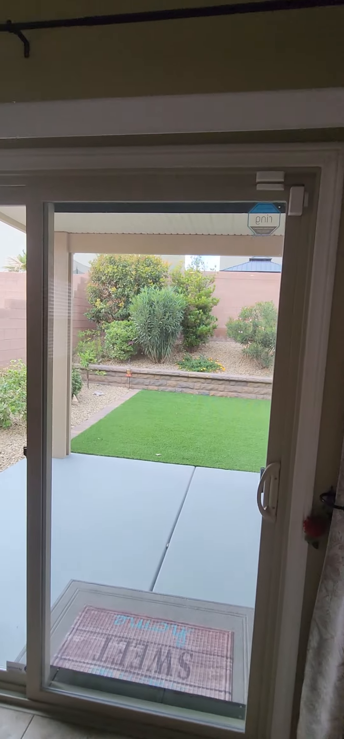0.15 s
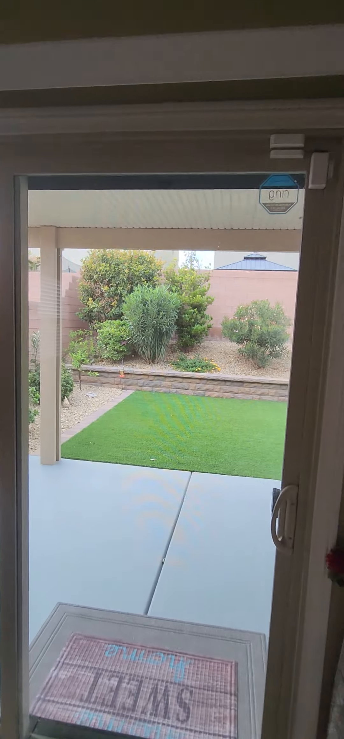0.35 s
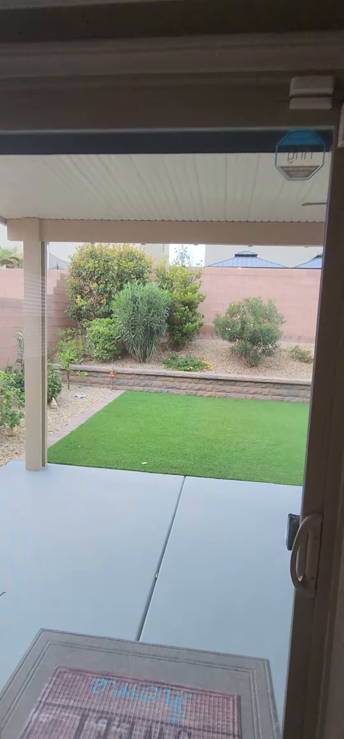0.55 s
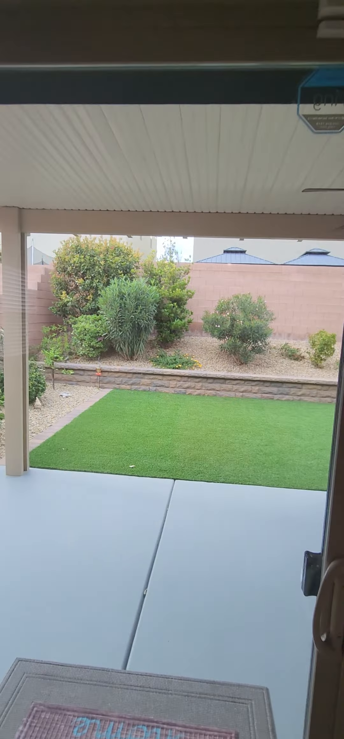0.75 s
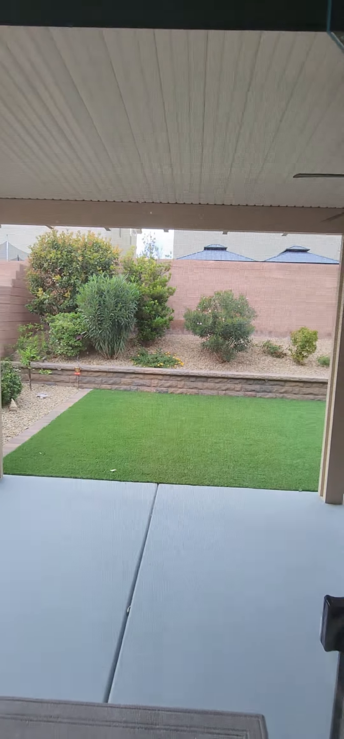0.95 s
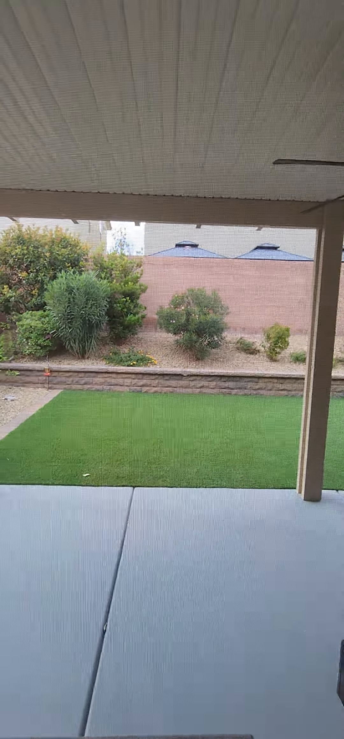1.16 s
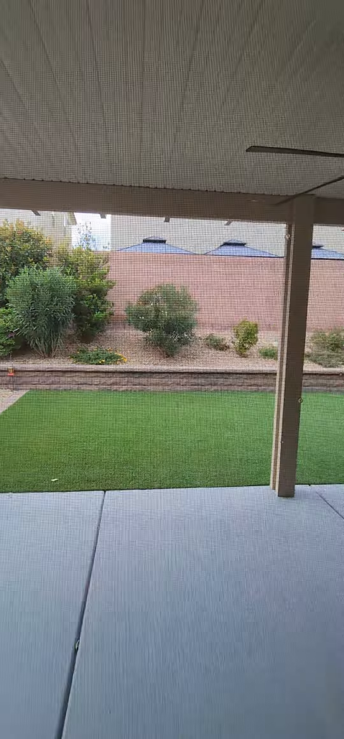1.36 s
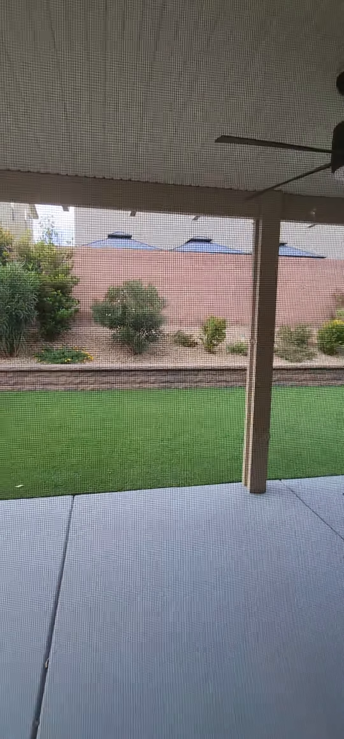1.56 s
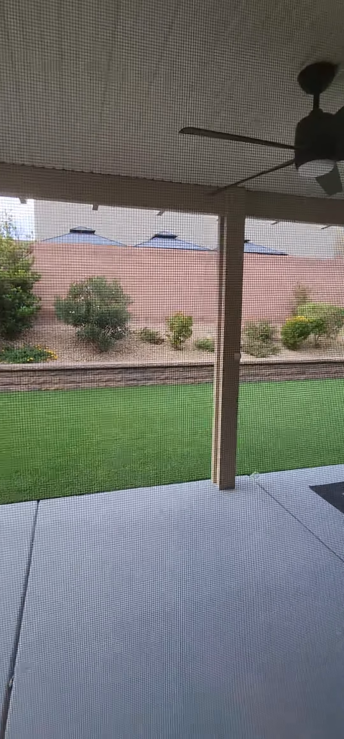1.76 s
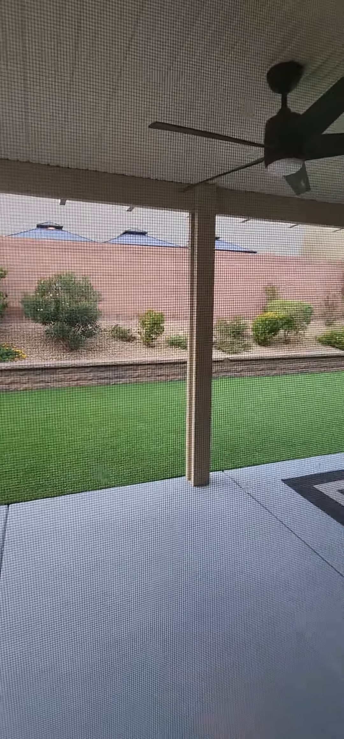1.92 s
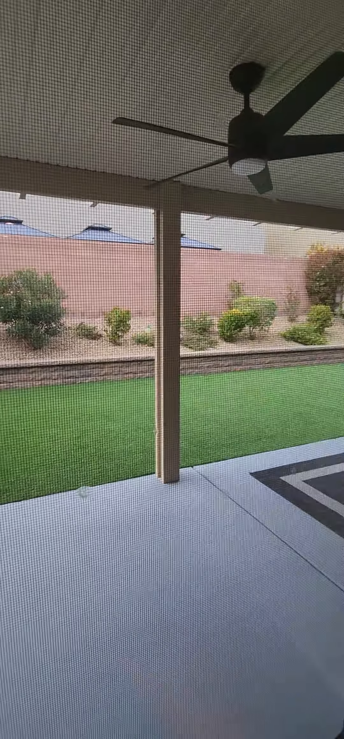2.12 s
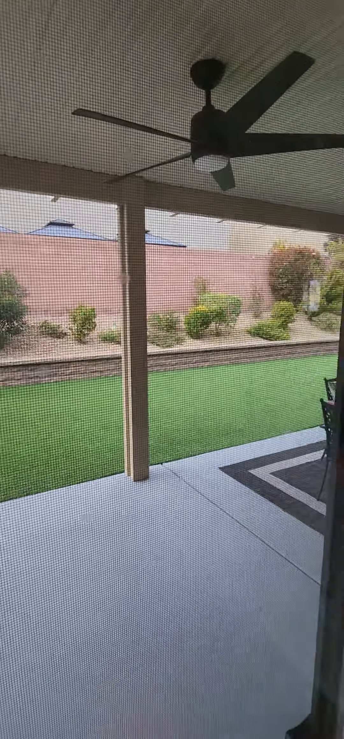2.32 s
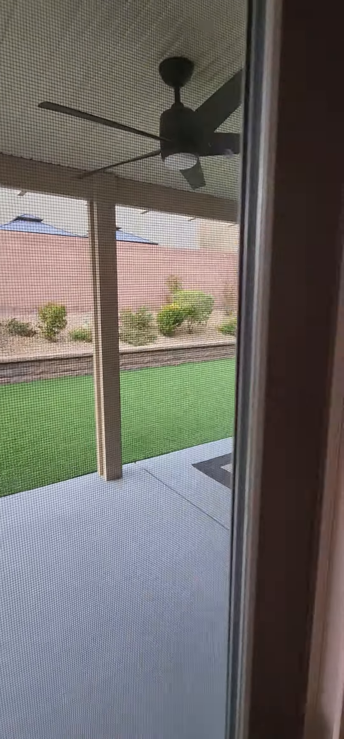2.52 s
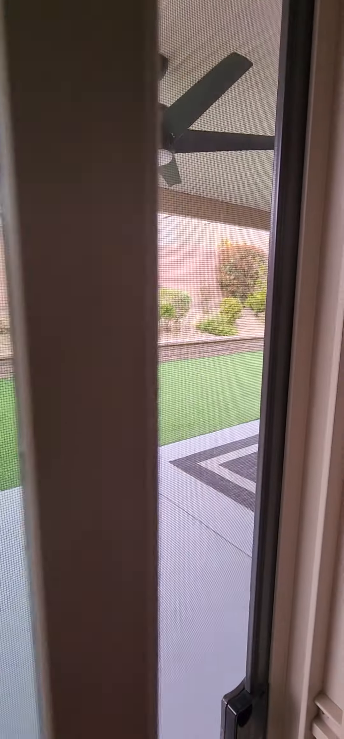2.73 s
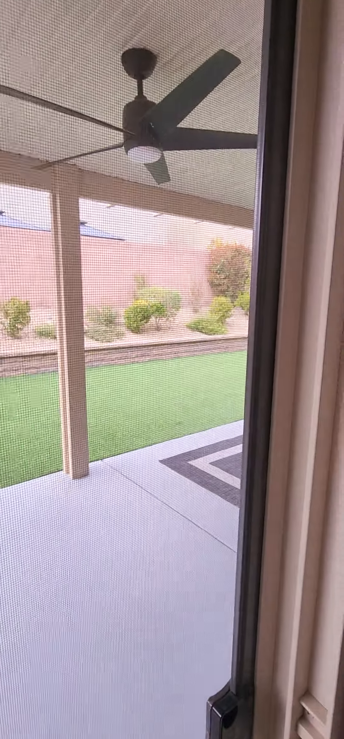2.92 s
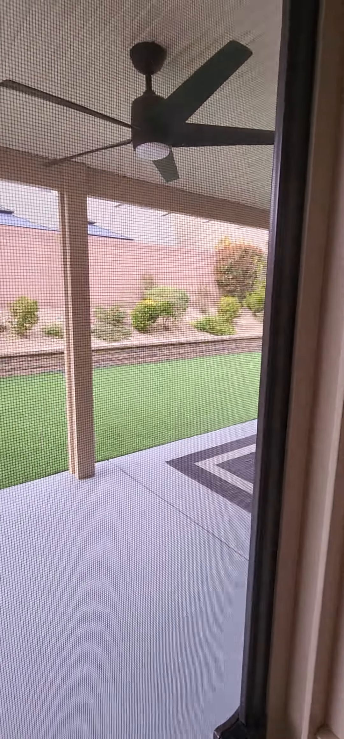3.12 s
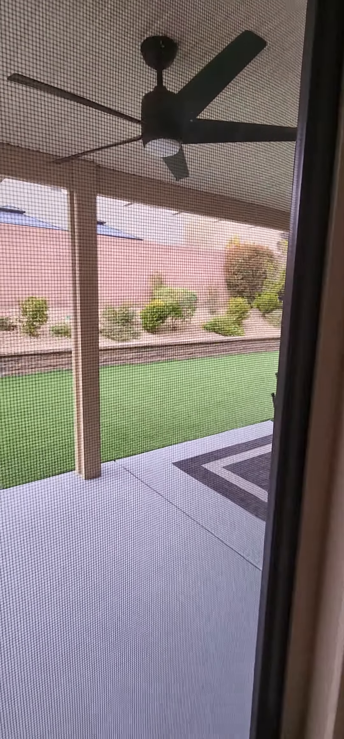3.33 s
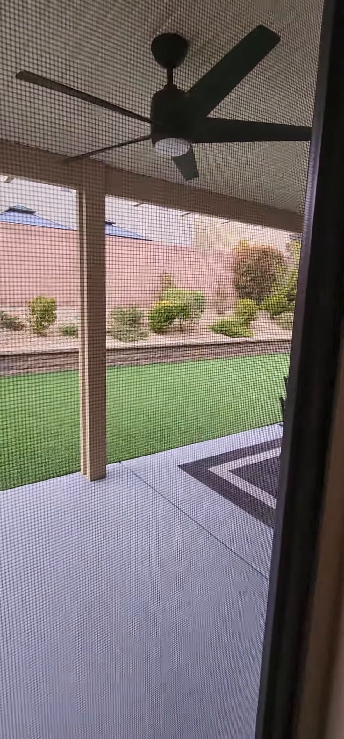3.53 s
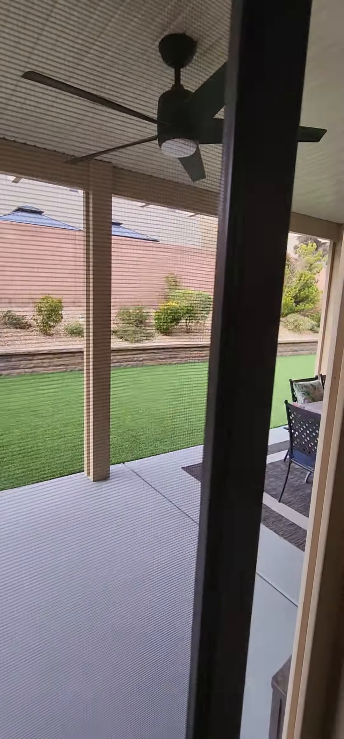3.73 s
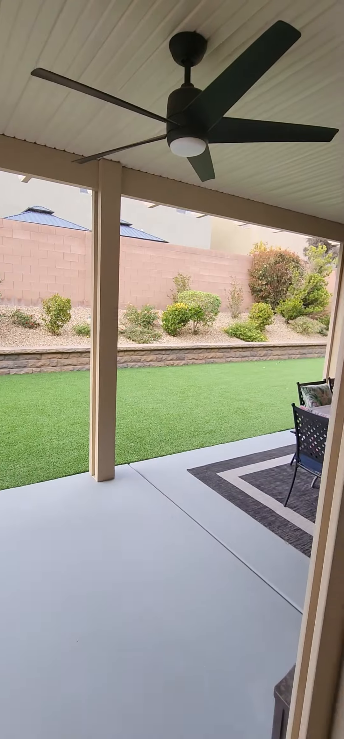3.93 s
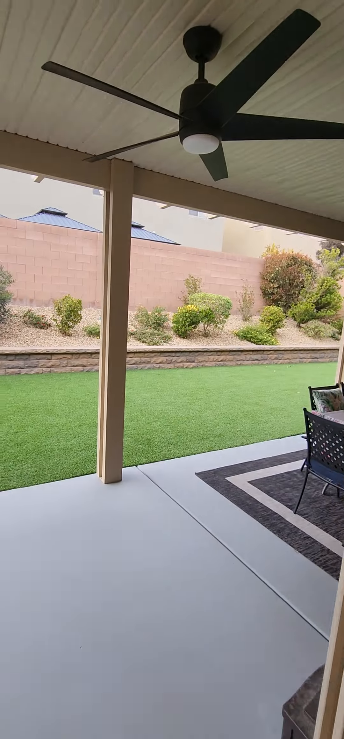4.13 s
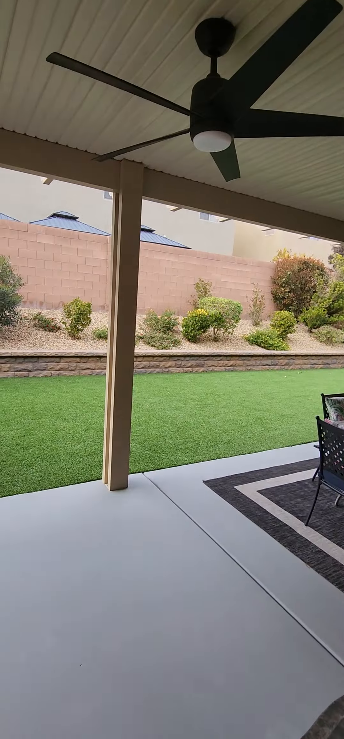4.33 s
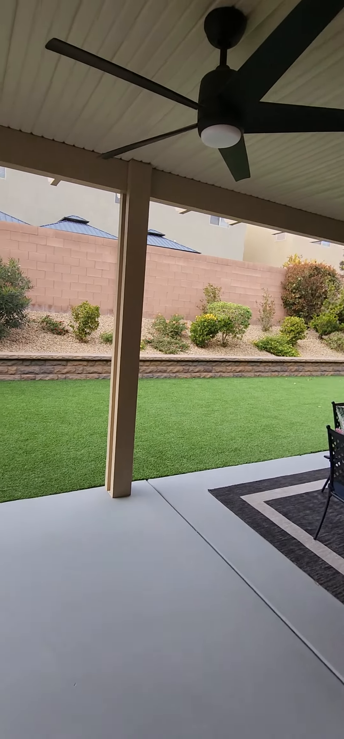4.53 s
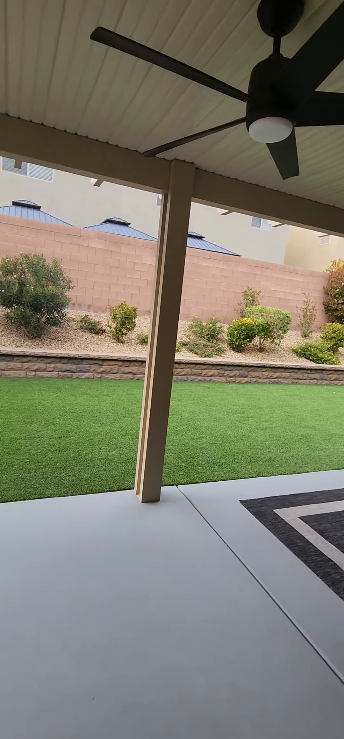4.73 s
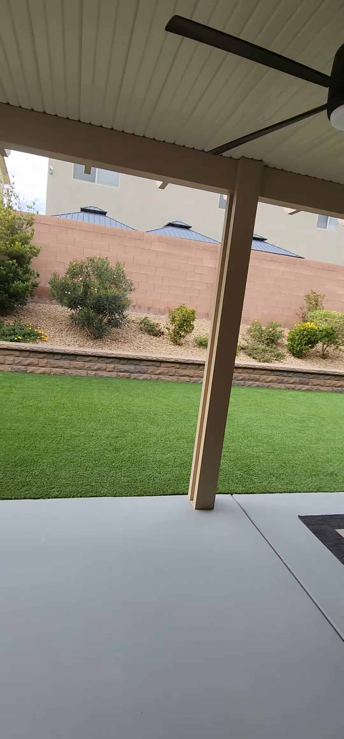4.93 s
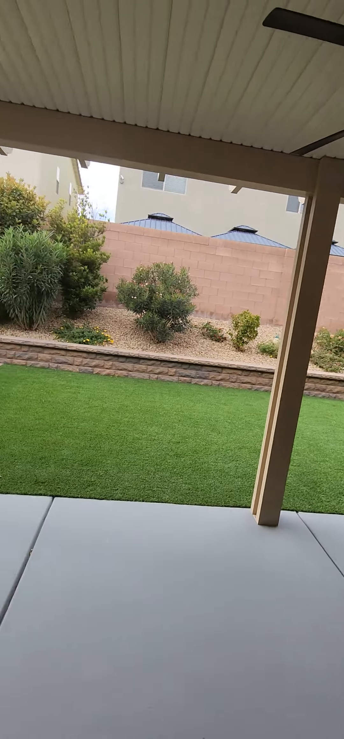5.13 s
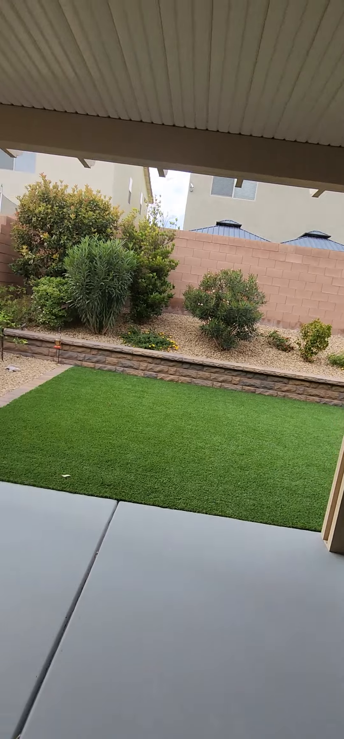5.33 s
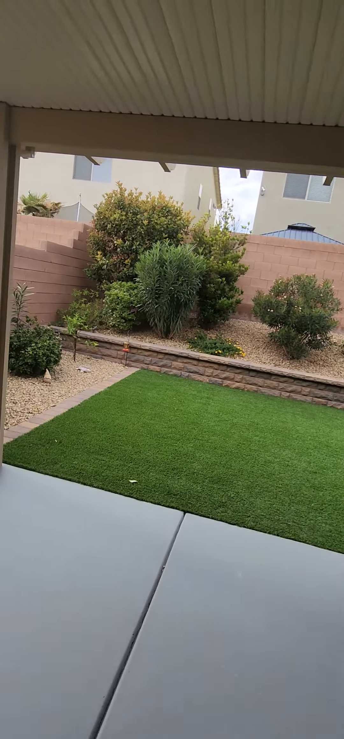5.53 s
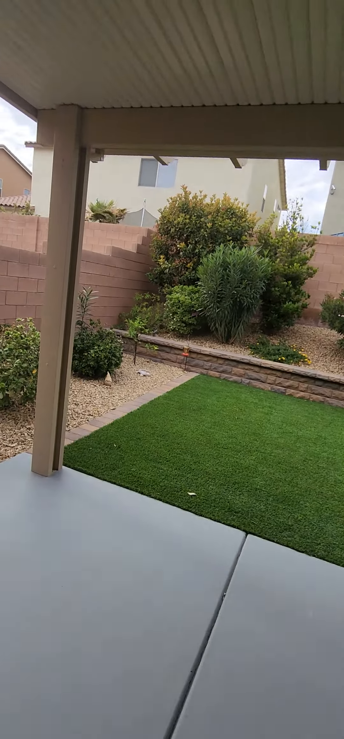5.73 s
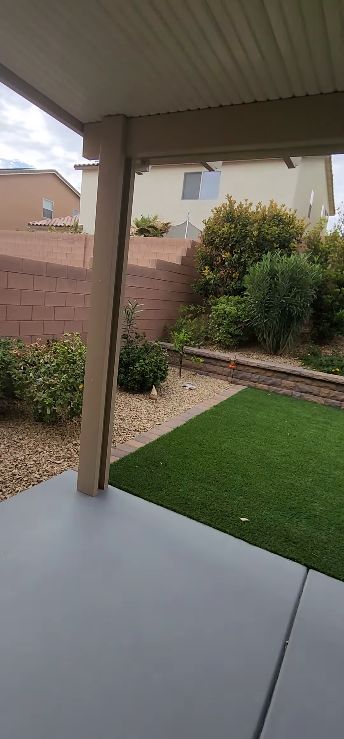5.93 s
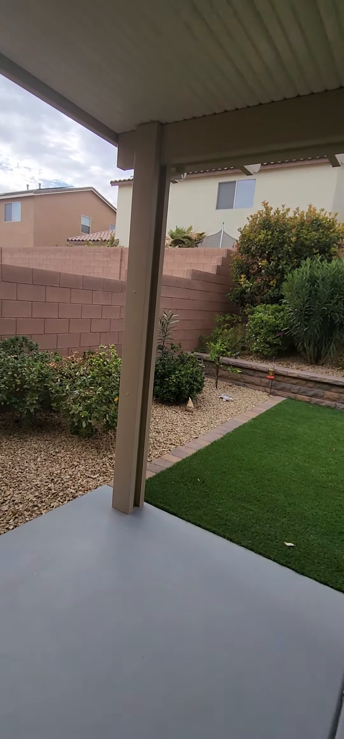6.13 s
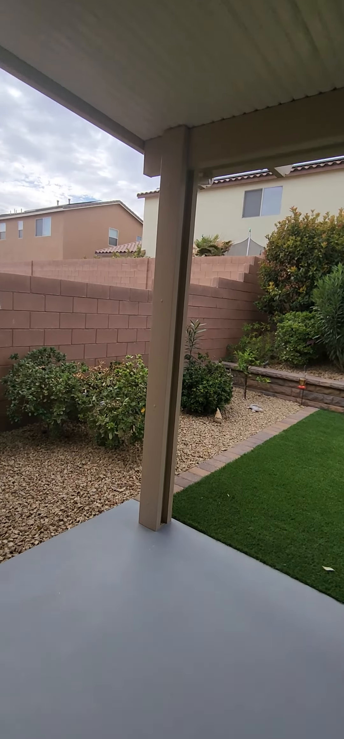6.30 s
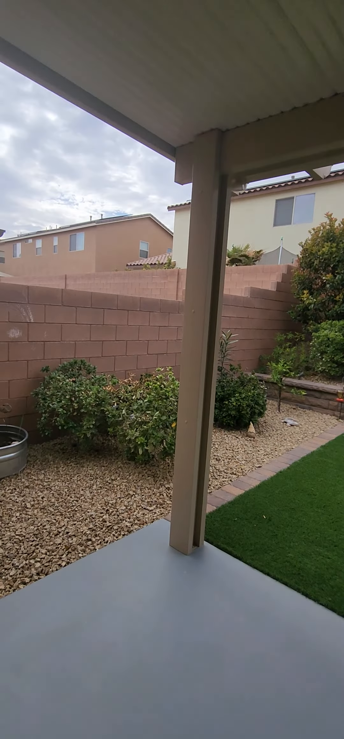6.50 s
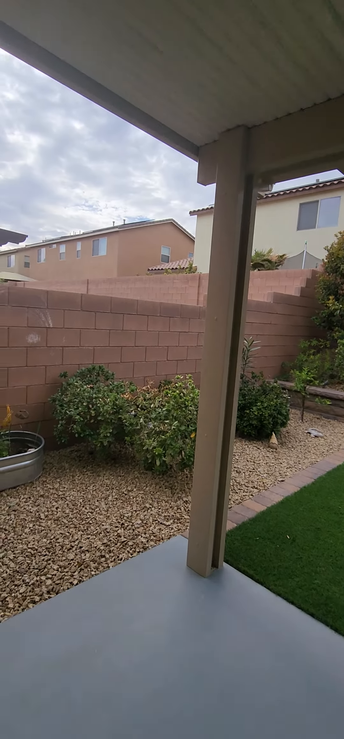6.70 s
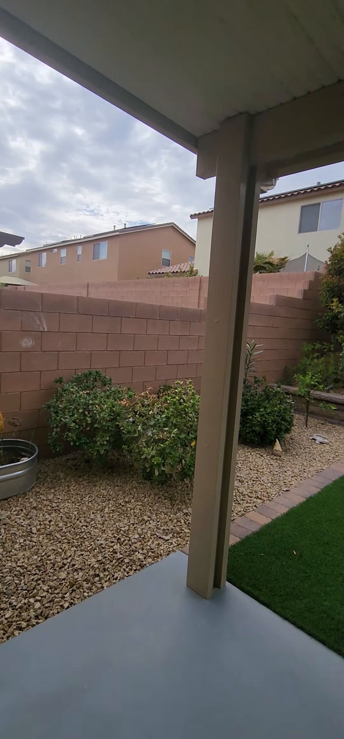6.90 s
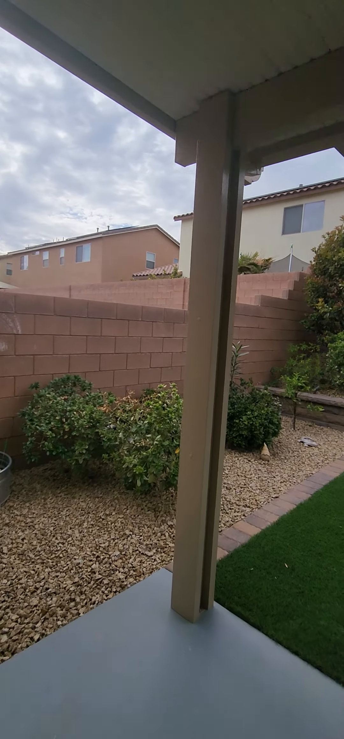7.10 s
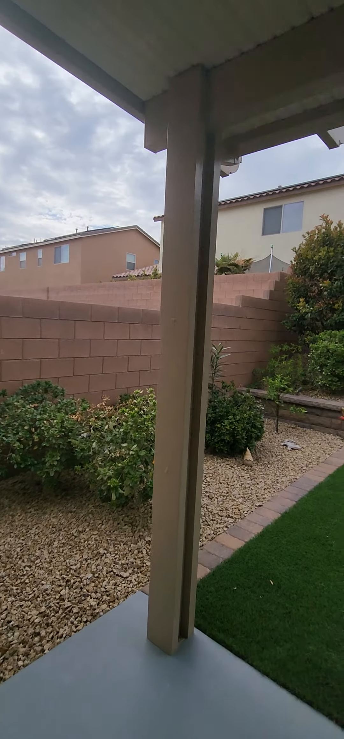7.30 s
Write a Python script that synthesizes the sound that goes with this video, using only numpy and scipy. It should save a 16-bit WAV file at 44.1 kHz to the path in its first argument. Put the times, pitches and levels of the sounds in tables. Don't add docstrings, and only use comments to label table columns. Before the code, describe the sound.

A low, quiet room hum with soft footfalls and gritty scuffs on tile around 0.4, 0.9 and 1.3 seconds. At 1.5 a steel latch snaps very loudly in a rapid cluster of bright bounces, with a thin spring zing and frame shudder, followed by handle clicks to 2.0. Tiny rubber squeaks at 2.05-2.15 lead into a crackling seal release and a deep glass boom near 2.25. The heavy door rolls with gritty rumble and dusty hiss, slowing by 3.2; clicks mark its stop at 3.3. A light screen door jerks, hesitates, then rattles densely from 3.6, strongest near 4.0, thinning out by 4.85. Steps land on concrete around 5.3 and 5.7, then fainter at 6.5 and 7.0. Indoor reverberation gives way to soft breeze, low hum and a faint distant car swell after 6.4. Close handheld stereo, nearer on the right.

```python
import sys
import numpy as np
from scipy import signal
from scipy.fft import rfft, irfft, next_fast_len
from scipy.io import wavfile
from scipy.ndimage import uniform_filter1d

SR = 44100
rng = np.random.default_rng(int(sys.argv[2]) if len(sys.argv) > 2 else 0)


def materialize(psi):
    bounded = np.clip(np.atleast_2d(psi).T, -1, 1)
    quanta = np.round(bounded * 32767).astype(np.int16)
    wavfile.write(sys.argv[1], SR, quanta)


def volts_from_decibels(level):
    exponent = np.asarray(level, float) / 20
    return 10 ** exponent


N = 324443
TIME = np.arange(N) / SR
LEAVES_S, LEAVING_S = 2.94, 1.15


def unit(x):
    return x / np.sqrt(np.mean(x ** 2))


def noise():
    return rng.standard_normal(N)


def ramp(start_s, length_s):
    return np.clip((TIME - start_s) / length_s, 0, 1)


def swell(start_s, rise_s, hold_s, fall_s):
    return ramp(start_s, rise_s) - ramp(start_s + rise_s + hold_s, fall_s)


def curve(rows, column, off=-120):
    rows = np.array(rows)
    return np.interp(TIME, rows[:, 0], rows[:, column], left=off, right=off)


def walk(rate_hz):
    k = int(SR / rate_hz)
    held = np.repeat(rng.standard_normal(N // k + 1), k)
    return unit(uniform_filter1d(uniform_filter1d(held, k), k)[:N])


def grit(rate_hz, spread_db):
    hits = rng.random(N) < rate_hz / SR
    return unit(hits * noise() * volts_from_decibels(spread_db * np.minimum(rng.exponential(size=N), 4)))


def burst(t60, rise, size=16384):
    t = np.arange(size) / SR
    decay = np.exp(-np.log(1000) * t / max(t60, .003))
    return rng.standard_normal(size) * (1 - np.exp(-t / rise)) * decay


def gain(points, size):
    hz, db = np.transpose(points)
    grid_hz = np.arange(size // 2 + 1) * SR / size
    return volts_from_decibels(np.interp(np.log(grid_hz + 1), np.log(hz), db))


def colour(x, points):
    size = next_fast_len(N)
    points = [(0.97, -99)] + list(points) + [(SR, -150)]
    return unit(irfft(rfft(x, size) * gain(points, size), size)[..., :N])


def band(x, hz, width_hz):
    return signal.lfilter(*signal.iirpeak(hz, hz / width_hz, SR), x)


def steep(x, hz, width_hz):
    return band(band(x, hz, width_hz), hz, 2.0 * width_hz)


def body(x, peaks):
    parts = [volts_from_decibels(db) * band(x, hz, width_hz) for hz, width_hz, db in peaks]
    return unit(sum((-1) ** k * part for k, part in enumerate(parts)))


def ring(x, modes):
    out = 0
    for hz, db, t60 in modes:
        pole = np.exp(2j * np.pi * hz / SR - np.log(1000) / (t60 * SR))
        out = out + volts_from_decibels(db) * signal.lfilter([1], [1, -pole], x).imag
    return out


def add(out, x, s, db):
    i = int(s * SR)
    out[i:i + len(x)] += (volts_from_decibels(db) * x / np.abs(x).max())[:N - i]


def sheen(points, gate):
    return gate * colour(rng.standard_normal((2, N)), points)


def air(points, split_hz):
    high = signal.butter(1, split_hz, "high", fs=SR)
    mid, side = noise(), noise()
    side = signal.lfilter(*high, side)
    mid = mid - signal.lfilter(*high, mid) * 0.045
    return colour(np.array([mid + side, mid - side]), points)


# f/Hz, level/dB per Hz
HOUSE_SPECTRUM = [(20, -24), (30, -10.5), (59, 1), (110, -7.5), (200, -19), (285, -7), (380, -18.5),
                  (700, -17.5), (1100, -30), (1600, -24), (2000, -33.5), (4000, -39.5), (6000, -50.5)]
HOUSE_DB, NEARER_DB_PER_S, LEFT_DB = -64, 3, 18.5
LAST_STEP_DB, LAST_STEP_S = 14.5, 0.11


def house():
    level_db = HOUSE_DB + NEARER_DB_PER_S * np.minimum(TIME, LEAVES_S)
    level_db = level_db - LEFT_DB * ramp(LEAVES_S, LEAVING_S)
    level_db = level_db + LAST_STEP_DB * (1 - ramp(0, LAST_STEP_S))
    return volts_from_decibels(level_db + 1.0 * walk(47)) * air(HOUSE_SPECTRUM, 600)


# f/Hz, level/dB per Hz
HISS_SPECTRUM = [(1500, -9.5), (3000, -3), (6000, -5.5), (7500, 5), (8600, -10), (11000, -12), (16000, -9)]
HISS_DB = -81


def hiss():
    return volts_from_decibels(HISS_DB) * colour(rng.standard_normal((2, N)), HISS_SPECTRUM)


# t/s, length/s, rise/s, level/dB, treble over middle/dB
SCUFFS = [(0, 0.057, .001, -78.5, -6), (0.346, 0.096, 0.008, -67.5, 4.5), (.45, 0.1, .01, -77.5, -1),
          (0.891, 0.071, 0.0013, -57, 2.5), (1.272, 0.28, 0.017, -51, 1),
          (1.324, 0.044, 0.011, -40.5, -7.5), (1.566, 0.0056, 0.0085, -58, -7),
          (1.915, 0.22, 0.016, -54, -3.5), (5.19, 0.286, 0.062, -75.5, -7),
          (5.817, 0.013, 0.0042, -72, -2.5), (6.415, .12, .02, -76.5, -6), (7.036, 0.045, .01, -81.5, -6),
          (7.169, 0.057, 0.0051, -70, -9)]
# f/Hz, level/dB per Hz
SHUFFLE_SPECTRUM = [(590, -32.5), (1000, -9), (1960, -4), (2140, -5), (2510, -3), (7490, 1), (9000, -7.5),
                    (11700, -41.5), (19800, -120)]


def scuffs():
    middle = colour(grit(6000, 2.1), SHUFFLE_SPECTRUM)
    top = colour(grit(8000, 1.4), [(7000, -17.0), (9000, -5.5), (11500, 0.5), (15800, 2.5), (16400, -24.5)])
    out = np.zeros(N)
    for s, length_s, rise_s, db, top_db in SCUFFS:
        lift = np.exp(-np.clip(TIME - s - length_s, 0, 9) / .016)
        out += volts_from_decibels(db) * ramp(s, rise_s) * lift * (middle + volts_from_decibels(top_db) * top)
    return out


# t/s, peak level/dB, f/Hz, slap over thud/dB
STEPS = [(0.356, -50.5, 236, -25), (0.51, -37, 300, -3), (.893, -33, 300, -20), (.893, -38, 620, -14),
         (.897, -43.5, 150, -28), (1.297, -34.5, 260, -17), (1.0, -46.5, 750, -12), (1.79, -42, 198, -29),
         (0.994, -37.5, 297, -4.5), (1.278, -36, 288, -15), (1.311, -45, 150, -15),
         (1.515, -25.5, 272, -24), (1.52, -34.5, 139, -25), (1.805, -37, 400, -27),
         (1.899, -33.5, 134, -13), (1.954, -37.5, 150, -32), (2.0, -37.5, 700, -5), (2.08, -50, 800, -4),
         (3.315, -40, 120, -36), (4.423, -31, 376, -8), (4.476, -46, 330, -15), (5.298, -36.5, 338, -3.5),
         (5.2987, -35, 650, -8), (5.663, -26, 420, -19.5), (5.683, -36, 420, -26), (5.7, -47, 590, -24),
         (5.35, -48.5, 330, -15), (5.664, -32.5, 138.6, -26.5), (5.82, -49, 150, -14),
         (6.498, -44, 398, -11), (7.028, -47.5, 302, -19)]
HARD_RING_S, SOFTER_DB_PER_DOUBLING, LONGEST_RING_S = 0.044, 10, .45


def steps():
    out = np.zeros(N)
    for s, db, hz, slap_db in STEPS:
        t60 = min(HARD_RING_S * 2 ** (-slap_db / SOFTER_DB_PER_DOUBLING), LONGEST_RING_S)
        push = burst(t60, rise=0.00063)
        push[:48] += 2.0 * np.hanning(48)
        slap = steep(burst(0.36 * t60, rise=0.00052), 1494, 600) + 0.16 * steep(push, 1100, 760)
        add(out, steep(push, hz, 0.49 * hz), s, db)
        add(out, slap, s, db + slap_db)
    return out


# t/s, peak level/dB, f/Hz
ROOM_CLICKS = [(1.2825, -30.5, 7500), (1.4785, -29, 2900), (1.482, -18.5, 1300), (1.4874, -24.5, 6630),
               (1.582, -29.5, 9060), (1.589, -23.5, 4510), (1.603, -13.5, 2750), (1.7575, -22, 3720),
               (1.769, -28, 2765), (1.791, -31.5, 1245), (1.803, -32, 948), (1.758, -33, 2300),
               (3.299, -44, 4500), (3.314, -37, 4200), (1.801, -31.5, 4470), (1.898, -46, 4210),
               (1.9264, -42, 4170), (1.9355, -27.5, 4400), (1.94, -26, 1420), (1.993, -37, 4860),
               (2.0054, -25, 4720), (2.0148, -26.5, 4220), (2.043, -34, 4670), (2.1755, -49, 6050),
               (2.2284, -19, 4200), (2.493, -33.5, 3930), (2.614, -38, 1500), (2.662, -35, 2280),
               (2.663, -39, 7000), (2.797, -37, 1500), (2.806, -54, 5000), (2.84, -49, 5000),
               (2.866, -52, 3500), (2.897, -35, 1500), (3.025, -51, 3000), (3.04, -43, 4480),
               (.511, -41, 1700), (.472, -49.5, 1580), (1.478, -28, 12980), (1.477, -30, 2900),
               (1.509, -16.5, 12500), (.511, -58, 7000), (.894, -47, 3000), (2.198, -22, 2000),
               (1.5815, -27.5, 12510), (1.6035, -34, 14500), (1.758, -41.5, 12280), (1.775, -52, 15010),
               (1.908, -42, 5000), (1.918, -48, 5000), (1.936, -32.5, 11000), (2.018, -26, 1850),
               (3.263, -27.5, 4400), (3.2744, -37, 3930), (3.264, -33.5, 1700), (3.3055, -20, 4760),
               (3.307, -31.5, 1500), (3.3092, -27, 4200)]
# t/s, peak level/dB, f/Hz
PATIO_CLICKS = [(4.764, -31.5, 1700), (4.8195, -32.5, 3000), (4.8195, -39, 1190), (4.832, -42, 3500),
                (4.8325, -47.5, 4200), (5.2255, -54, 7040), (5.298, -36.5, 1100), (5.2985, -43, 1500),
                (5.299, -50, 2013), (5.349, -50, 2200), (5.6645, -61.5, 2250), (6.499, -55.5, 1396),
                (6.499, -64, 3800), (6.565, -60, 4200), (6.64, -68, 5500), (7.177, -54, 5670),
                (7.178, -44.5, 1990)]
CLICK_HZ, CLICK_T60_S = 4013, 0.012
EDGE_DB, ROOM_EDGE_DB_PER_OCTAVE, PATIO_EDGE_DB_PER_OCTAVE = -14.5, 8, 19


def clicks():
    out = np.zeros(N)
    contact = np.pad(np.hanning(5), (8, 4083))
    for rows, slope_db in (ROOM_CLICKS, ROOM_EDGE_DB_PER_OCTAVE), (PATIO_CLICKS, PATIO_EDGE_DB_PER_OCTAVE):
        for s, db, hz in rows:
            t60 = CLICK_T60_S * (CLICK_HZ / hz) ** 0.68
            tick = contact + 0.52 * burst(t60, rise=0.0005, size=4096)
            edge = burst(0.57 * t60, rise=0.00018, size=4096)
            add(out, steep(tick, hz, 0.43 * hz), s, db)
            add(out, steep(edge, 13000, 9000), s, db + EDGE_DB + slope_db * np.log2(hz / CLICK_HZ))
    return out


# f/Hz, level/dB per Hz
YARD_SPECTRUM = [(20, -4.5), (30, -15.5), (48, -1.5), (70, -12), (127, -8), (190, -25.5), (290, -23),
                 (500, -34.5), (1200, -36.5), (2500, -47.5), (6000, -71.5)]
# t/s, level/dB
GUSTS = [
    (5.55, 2),
    (7.13, 0.5),
]
YARD_DB, OPENS_S, OPENING_S, SHUT_DB, GUST_S = -54, 0.61, 1.1, 26, 0.32


def yard():
    gusts_db = sum(db * swell(s - GUST_S, GUST_S, 0, GUST_S) for s, db in GUSTS)
    level_db = YARD_DB - SHUT_DB * (1 - ramp(OPENS_S, OPENING_S)) + gusts_db
    return volts_from_decibels(level_db) * (TIME > OPENS_S) * air(YARD_SPECTRUM, 480)


# f/Hz, level/dB, t60/s
PANE_MODES = [(60, -6, 0.3), (70.7, -0.5, 0.23), (101, -1, 0.23), (128, 1.5, 0.14), (224.5, -12, 0.13),
              (293, -15.5, 0.19)]
# t/s, level/dB
PANE_BLOWS = [(1.335, -36), (1.39, -37.5), (1.52, -29), (2.205, -23.5), (2.223, -27), (2.237, -19),
              (2.26, -17.5), (2.28, -24), (3.32, -35), (3.454, -34), (3.501, -35.5), (3.98, -38)]


def pane():
    out, t = np.zeros(N), np.arange(SR) / SR
    for s, db in PANE_BLOWS:
        jolt = rng.standard_normal(SR) * np.exp(-t / 0.005)
        add(out, ring(jolt, PANE_MODES), s, db)
    return signal.lfilter(*signal.butter(2, 42, "high", fs=SR), out)


# t/s, peak level/dB, frame over hook/dB
LATCH = [
    (1.5002, -4.5, -18),
    (1.506, -11.5, -11),
    (1.5093, -10, 0),
    (1.5124, -10.5, -1),
    (1.5153, -3.5, -9),
    (1.5176, -3.5, -9),
    (1.522, -16.5, -7),
    (1.5313, -11.5, -3.5),
    (1.542, -25.5, 10.5),
]
# f/Hz, width/Hz, level/dB
HOOK_PEAKS = [(2540, 300, 3.5), (3058, 150, 4), (4200, 1300, -5), (5600, 600, -5.5), (6600, 600, -3),
              (7500, 1100, 3), (8500, 5700, -3), (11294, 3700, -10)]
# f/Hz, level/dB, t60/s
FRAME_MODES = [(143, -31, 0.16), (197, -39, 0.82), (413, -24, 0.052), (746, -23, 0.17), (1100, -7, 0.012),
               (1082, -11.5, 0.042), (1300, -7.5, 0.011), (1903, -12, 0.01)]
# t/s, peak level/dB, f/Hz
SPRING = [
    (1.4814, -32.5, 15020),
    (1.509, -15.5, 14470),
    (1.516, -14, 15000),
    (1.532, -24, 14230),
    (1.604, -33, 14900),
    (1.776, -48, 14810),
]
# f/Hz, level/dB per Hz
SHUDDER_SPECTRUM = [(290, -13.5), (500, -4), (1100, -2.5), (1900, -4), (3150, -6), (3750, -15.5),
                    (7600, -15.5), (8600, -31.5), (16000, -33.5)]
HOOK_DETUNE = .07
SPRING_WIDTH_HZ, SPRING_T60_S = 900, 0.037
SHUDDER_S, SHUDDER_DB, SHUDDER_T60_S = 1.52, -26, 0.26


def latch():
    out, thin = np.zeros(N), signal.butter(2, 620, "high", fs=SR)
    for s, db, frame_db in LATCH:
        held = [(hz * (1 + HOOK_DETUNE * rng.standard_normal()), width_hz, mode_db)
                for hz, width_hz, mode_db in HOOK_PEAKS]
        add(out, body(burst(.009, rise=.0003), held), s, db)
        knock = burst(0.0043, rise=0.00028)
        frame = ring(knock, FRAME_MODES[:4]) + signal.lfilter(*thin, ring(knock, FRAME_MODES[4:]))
        add(out, frame, s, db + frame_db)
    for s, db, hz in SPRING:
        add(out, steep(burst(SPRING_T60_S, rise=0.00039), hz, SPRING_WIDTH_HZ), s, db)
    decay = volts_from_decibels(SHUDDER_DB - 60 * np.maximum(TIME - SHUDDER_S, 0) / SHUDDER_T60_S)
    return out + ramp(SHUDDER_S, .006) * decay * colour(grit(9000, 1.3), SHUDDER_SPECTRUM)


# t/s, length/s, f/Hz, rise at the end/Hz, level/dB
SQUEAK = [
    (2.044, 0.0205, 1470, -70, -45.5),
    (2.075, 0.0073, 1780, -120, -38),
    (2.086, 0.029, 1676, 122, -36.5),
    (2.121, 0.0099, 2200, 60.5, -53),
    (2.129, 0.025, 1730, -28, -59),
]
SQUEAK_EDGE_S = 0.0022


def squeak():
    out, wobble = np.zeros(N), 1 + 0.0096 * walk(350)
    for s, length_s, hz, bend_hz, db in SQUEAK:
        along = ramp(s, length_s)
        phase = 2 * np.pi * np.cumsum((hz + bend_hz * along ** 1.8) * wobble) / SR
        shape = swell(s - SQUEAK_EDGE_S, SQUEAK_EDGE_S, length_s, SQUEAK_EDGE_S) ** 2
        shape = shape * volts_from_decibels(3.5 * (along + 0.5))
        overtones = 1.3 * np.sin(2 * phase) + np.sin(3 * phase)
        out += 1.4 * volts_from_decibels(db) * shape * (np.sin(phase) + volts_from_decibels(2 * db + 60) * overtones)
    return out


SEAL_S, SEAL_RISE_S, SEAL_HOLD_S, SEAL_FALL_S = 2.143, .038, 0.036, 0.09
SEAL_DB, SEAL_DEPTH_DB, SEAL_DARKENS_S = -31.5, 25, 0.035


def seal():
    crackle = grit(6000, 1.8)
    high = 0.34 * (1 - ramp(SEAL_S, SEAL_DARKENS_S))
    rip = high * unit(steep(crackle, 1800, 900)) + (1 - high) * unit(steep(crackle, 1300, 1200))
    rip = rip + volts_from_decibels(-4) * band(crackle, 2400, 1500) + volts_from_decibels(-19) * crackle
    tear = swell(SEAL_S, SEAL_RISE_S, SEAL_HOLD_S, SEAL_FALL_S)
    return volts_from_decibels(SEAL_DB + SEAL_DEPTH_DB * (tear ** 1.1 - 1)) * (tear > 0) * rip


FULL_SPEED_DB = -40
# t/s, level/dB
GLASS_EFFORT = [
    (2.2, -37.5),
    (2.278, -42.5),
    (2.414, -42),
    (2.7, -41.5),
    (2.904, -44.5),
    (3.206, -60.5),
    (3.26, -63),
]
# f/Hz, width/Hz, level/dB
GLASS_BODY = [(150, 14, -5.5), (200, 59, -2), (300, 66, 1), (410, 76, -2.5), (505.8, 110, -6),
              (625, 70, 0.5), (740, 100, -3), (998, 630, -15)]
# f/Hz, width/Hz, level/dB
GLASS_RAIL = [(1070, 250, -4), (1500, 660, -1.5), (2200, 400, -1), (3000, 1100, -13), (4270, 480, -7)]
# f/Hz, level/dB per Hz
GLASS_DUST = [(3500, -6.5), (5100, -11.5), (6300, -6.5), (7500, -6.5), (9200, -11), (11000, -7),
              (11700, -6.5), (15900, -3.5)]
GLASS_SCRAPE_DB, GLASS_DUST_DB, GLASS_DUST_SHARE = -7.5, -51.5, 0.5
DRONE_DB, SHAKEN_DB, SHAKEN_S, SETTLES_S = -8, 19, 2.28, 0.13


def glass_door():
    effort_db = curve(GLASS_EFFORT, 1)
    bumps = volts_from_decibels(1.2 * walk(70))
    drone_db = DRONE_DB + SHAKEN_DB * np.exp(-np.abs(TIME - SHAKEN_S) / SETTLES_S)
    drone = unit(ring(noise(), PANE_MODES)) * volts_from_decibels(drone_db)
    scrape = body(grit(5800, 1.35), GLASS_RAIL) * volts_from_decibels(GLASS_SCRAPE_DB)
    frame = body(grit(6000, 2.0), GLASS_BODY)
    dust_db = GLASS_DUST_DB + GLASS_DUST_SHARE * (effort_db - FULL_SPEED_DB)
    dust = sheen(GLASS_DUST, volts_from_decibels(dust_db) * (effort_db > -99))
    return volts_from_decibels(effort_db) * (bumps * (frame + scrape) + drone), dust


# f/Hz, width/Hz, level/dB
TYRE_PEAKS = [(620, 200, -8), (876, 170, 6.5), (1050, 220, 7.5), (1187, 310, 5), (1335, 450, 8.5),
              (1700, 466, 8)]
ROAD_DB, ROAD_DEPTH_DB = -68, 6.5
ROAD_S, ROAD_RISE_S, ROAD_HOLD_S, ROAD_FALL_S = 6.4, 0.063, 1, 0.77
BRIGHTENS_S_PER_OCTAVE, CREST_S, CREST_DB, CREST_WIDTH_S = 1.19, 5.84, 11, 0.23


def road():
    roar = np.zeros((2, N))
    for hz, width_hz, db in TYRE_PEAKS:
        crest_s = CREST_S + BRIGHTENS_S_PER_OCTAVE * np.log2(hz / TYRE_PEAKS[1][0])
        crest_db = CREST_DB * np.exp(-((TIME - crest_s) / CREST_WIDTH_S) ** 2)
        source = noise() + 0.84 * rng.standard_normal((2, N))
        roar += volts_from_decibels(db + 1.2 * walk(5.2) + crest_db) * steep(source, hz, width_hz)
    level_db = ROAD_DB + ROAD_DEPTH_DB * (swell(ROAD_S, ROAD_RISE_S, ROAD_HOLD_S, ROAD_FALL_S) - 1)
    far = colour(roar, [(300, 6), (700, 7.5), (1900, -12.0), (3000, -23)])
    return volts_from_decibels(level_db) * ramp(LEAVES_S, LEAVING_S) * far


# t/s, level/dB
SCREEN_EFFORT = [
    (3.308, -42),
    (3.342, -60),
    (3.622, -48.5),
    (3.806, -33),
    (4.2, -40.5),
    (4.582, -41),
    (4.842, -50.5),
    (4.872, -56),
    (5.0, -77.5),
]
# f/Hz, width/Hz, level/dB
SCREEN_BODY = [(95, 18, -5), (150, 38, -4.5), (203, 41, -1.5), (285, 59, 2.5), (420, 174, -6.5),
               (700, 160, -9)]
# t/s, peak level/dB, mesh tick level/dB
KNOCKS = [(3.3674, -56, -65), (3.3978, -37, -61), (3.424, -37.5, -62), (3.4473, -34.5, -59),
          (3.4544, -36, -64), (3.482, -46, -56), (3.5012, -36, -45.5), (3.5349, -49, -70),
          (3.5853, -36, -50), (3.6135, -36, -52), (3.6385, -32, -49), (3.6777, -41, -62),
          (3.6977, -50, -65), (3.7118, -34, -47), (3.7232, -27, -44), (3.7394, -38, -46),
          (3.7614, -34.5, -43), (3.7934, -28.5, -47), (3.8114, -29, -43), (3.8224, -37, -44),
          (3.8574, -39, -54), (3.8744, -41, -59), (3.888, -36, -54), (3.9015, -26, -60), (3.9194, -36, -60),
          (3.9394, -31, -52), (3.9554, -28, -54), (3.9729, -22, -48), (3.9866, -22, -53),
          (4.0044, -25, -50), (4.0228, -23.5, -37), (4.0417, -26, -46), (4.0607, -28, -37),
          (4.0784, -27.5, -46), (4.1002, -35, -42), (4.1187, -26, -40), (4.1603, -38, -39),
          (4.1664, -35, -42), (4.1878, -25.5, -58), (4.2122, -33, -65), (4.2365, -30, -51),
          (4.2632, -29.5, -54), (4.294, -30, -41), (4.3236, -29, -54), (4.3394, -27, -38),
          (4.3765, -28, -40), (4.3958, -35, -40), (4.4229, -32.5, -33), (4.4364, -32, -44),
          (4.4514, -34.5, -43), (4.4802, -32, -44), (4.5388, -35, -44), (4.5567, -28.5, -42),
          (4.6083, -32, -51), (4.6454, -39, -59), (4.6798, -28.5, -42.5), (4.7182, -35.5, -44),
          (4.8027, -48, -65)]
# f/Hz, width/Hz, level/dB
SCREEN_RAIL = [(1100, 410, -9.5), (1530, 270, -0.5), (2120, 410, -6), (2900, 200, -11.5), (3742, 320, -9),
               (4400, 110, -15.5)]
# f/Hz, level/dB per Hz
SCREEN_DUST = [(3500, 4.5), (4800, -10.5), (7500, -5), (9500, -13.5), (11800, -8.5), (15900, -10)]
RUMBLE_DB, RUMBLE_SHARE, RUMBLE_FADES_DB_PER_S = -44, 0.89, 4.5
SCREEN_DUST_DB, SCREEN_DUST_SHARE, DUST_FADES_DB_PER_S = -47.5, 0.96, 2
KNOCK_DB, MESH_DB, MESH_TICK_S = 5.5, 2.5, 0.0042
COAST_DB, COAST_S, COAST_RISE_S, COAST_FALL_S = -72.5, 5.17, 0.098, 0.51


def screen_door():
    effort_db, rolled_s = curve(SCREEN_EFFORT, 1), TIME - SCREEN_EFFORT[0][0]
    speed_db, moving = effort_db - FULL_SPEED_DB, effort_db > -99
    scrape = volts_from_decibels(-6.5 + 1.1 * walk(50)) * body(grit(6000, 1.489), SCREEN_RAIL)
    rumble_db = RUMBLE_DB + RUMBLE_SHARE * speed_db - RUMBLE_FADES_DB_PER_S * rolled_s
    rumble = body(grit(1000, 0.52), SCREEN_BODY) * volts_from_decibels(rumble_db + 0.61 * walk(60))
    dust_db = SCREEN_DUST_DB + SCREEN_DUST_SHARE * speed_db - DUST_FADES_DB_PER_S * rolled_s
    dust = moving * volts_from_decibels(dust_db + 2.1 * walk(72))
    knocks, mesh = np.zeros(N), np.zeros(N)
    for s, db, mesh_db in KNOCKS:
        add(knocks, burst(0.026, rise=0.00076, size=2048), s, db + KNOCK_DB)
        add(mesh, np.exp(-np.arange(2048) / SR / MESH_TICK_S), s, mesh_db + MESH_DB)
    rattle = sum(volts_from_decibels(db + 9) * band(knocks, hz, width_hz) for hz, width_hz, db in SCREEN_RAIL)
    coasting = swell(COAST_S, COAST_RISE_S, 0, COAST_FALL_S)
    coast = volts_from_decibels(COAST_DB + 4.0 + 27.0 * (coasting - 0.5)) * (coasting > 0) * band(scrape, 2200, 2300)
    return volts_from_decibels(effort_db) * scrape + moving * rumble + rattle + coast, sheen(SCREEN_DUST, dust + mesh)


def tail(t60, top_hz, size=SR, count=1):
    t = np.arange(size) / SR
    decay = np.exp(-np.log(1000) * t / t60) * (t > .0004)
    mid, side = rng.standard_normal((2, count, size)) * decay
    side = signal.lfilter(*signal.butter(1, 350, "high", fs=SR), side)
    both = signal.lfilter(*signal.butter(1, top_hz, fs=SR), np.array([mid + side, mid - side]))
    return both / np.sqrt((both ** 2).sum(axis=(0, 2), keepdims=True) / 2)


WALLS_FADE_DB_PER_S, SILL_S, SILL_DB = -0.48, 4.89, 10


def space(x, near_db, wet_db, t60, lag, scatter_s):
    hop = 768
    out = np.array([np.roll(x, int(lag)), x])
    walls = volts_from_decibels(-WALLS_FADE_DB_PER_S * TIME - SILL_DB * ramp(SILL_S, 0.31))
    out += signal.fftconvolve((x * walls)[None], volts_from_decibels(wet_db) * tail(t60, 4000)[:, 0], axes=1)[:, :N]
    count = N // hop + 1
    blocks = np.pad(x, (hop, count * hop - N)).reshape(-1, hop)
    window = np.sin(np.pi * np.arange(2 * hop) / (2 * hop))
    pieces = np.hstack([blocks[:-1], blocks[1:]]) * window
    patterns = tail(scatter_s, 20000, size=hop + 1, count=count)
    spread = signal.fftconvolve(pieces[None], patterns, axes=2)
    near = np.zeros((2, count + 2, hop))
    for k in range(3):
        near[:, k:k + count] += spread[..., k * hop:(k + 1) * hop]
    return out + volts_from_decibels(near_db) * near.reshape(2, -1)[:, hop:hop + N]


def scene():
    background = house() + hiss() + yard() + road()
    feet = space(steps() + scuffs(), -5.5, -4.5, 0.4, lag=21.0, scatter_s=0.01)
    hits = space(clicks(), -5, -12.0, 0.37, lag=13.0, scatter_s=0.0081)
    hits += space(latch() + seal(), 0.13, -13.5, 0.49, lag=8.0, scatter_s=0.0055)
    close = space(pane() + squeak(), -14, -22, .4, lag=18.0, scatter_s=.03)
    (glass, glass_hiss), (screen, screen_hiss) = glass_door(), screen_door()
    rolling = glass_hiss + screen_hiss + space(glass + screen, -4, -9, .3, lag=17.0, scatter_s=.008)
    return hits + feet + rolling + close + background


def low_pass(x):
    return signal.sosfilt(signal.butter(12, 16580, fs=SR, output="sos"), x)


# f/Hz, left minus right/dB
PORT_SHADE = [(30, 0), (5000, 0.5), (9000, -1.5), (12000, -9), (20000, 0.5)]


def record(dry):
    size = next_fast_len(N)
    shade = np.sqrt(gain(PORT_SHADE, size))
    ports = irfft(rfft(dry, size) * np.array([shade, 1 / shade]), size)[:, :N]
    ports = signal.sosfilt(signal.ellip(12, .3, 50, 15750, fs=SR, output="sos"), ports)
    mix = 1.388 * np.tanh(ports / 1.22)
    return low_pass(mix)


dry = scene()
out = record(dry)
materialize(out)
```